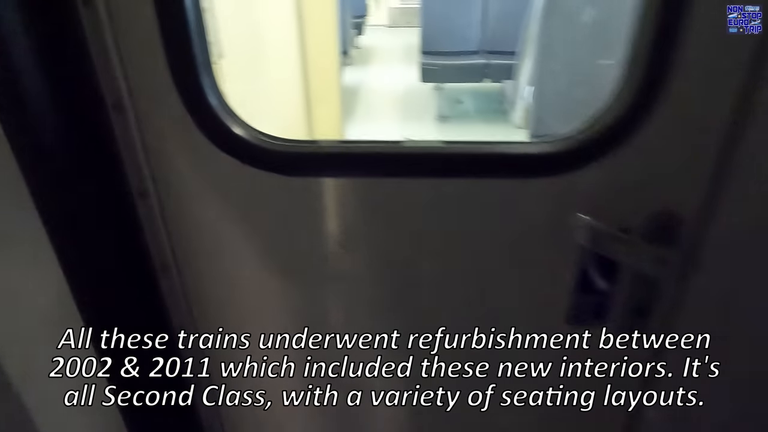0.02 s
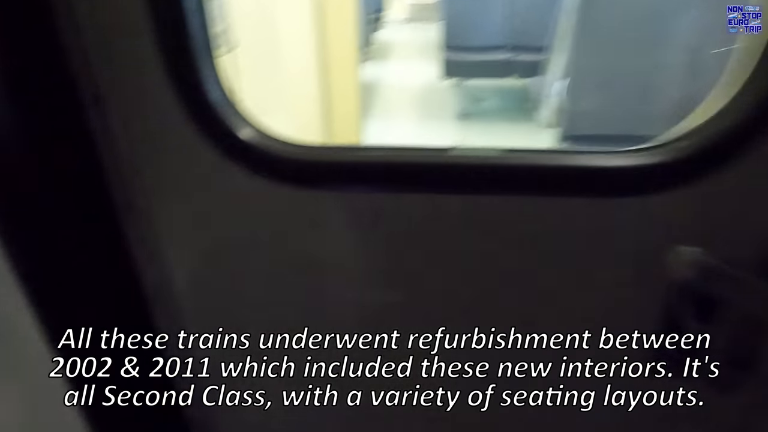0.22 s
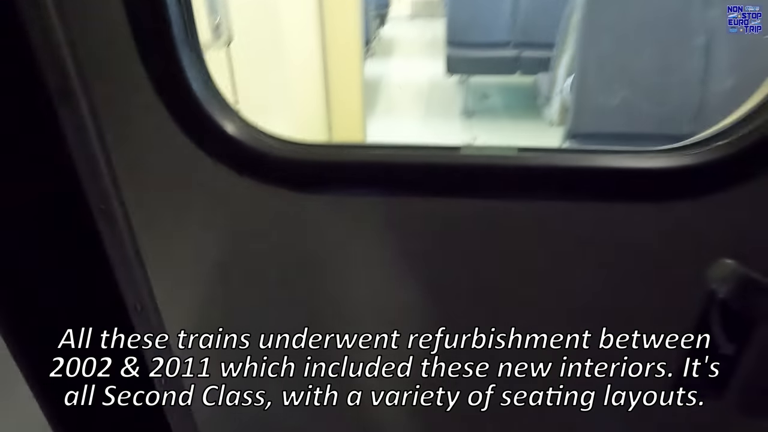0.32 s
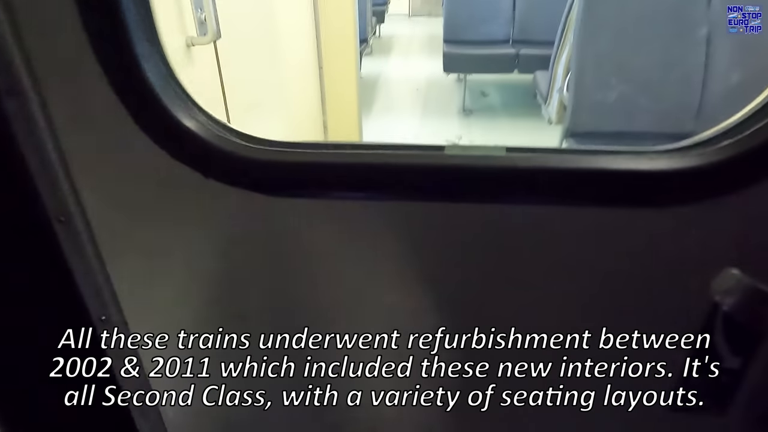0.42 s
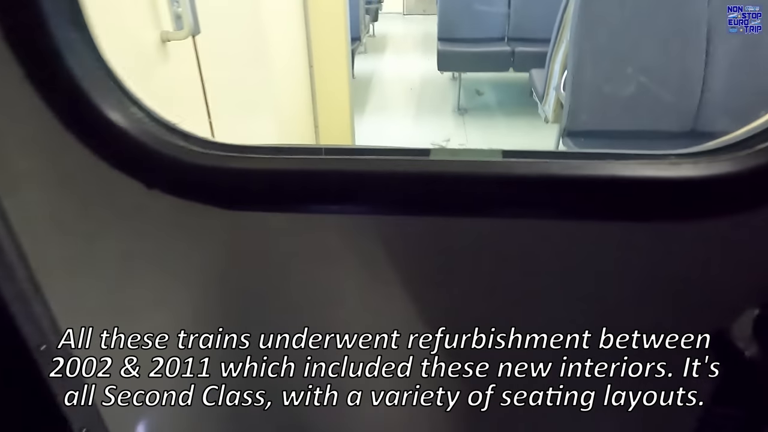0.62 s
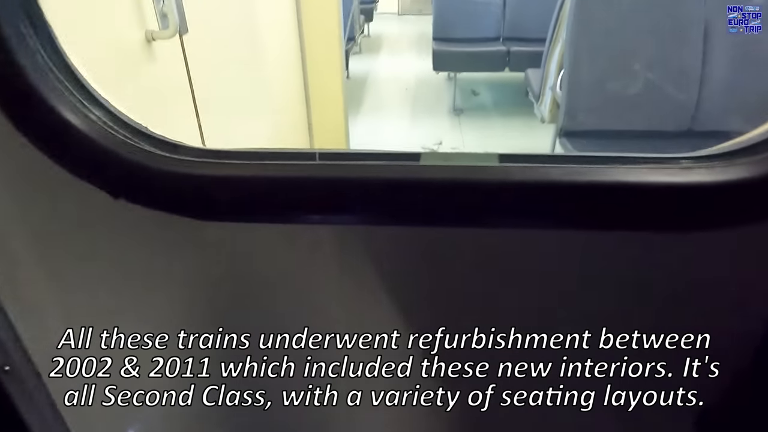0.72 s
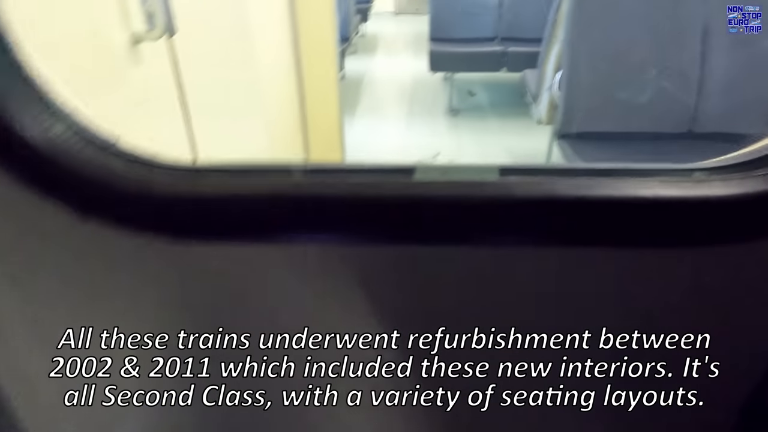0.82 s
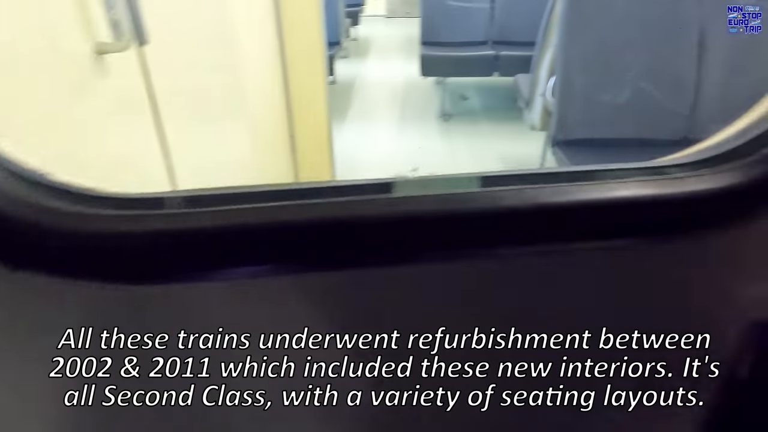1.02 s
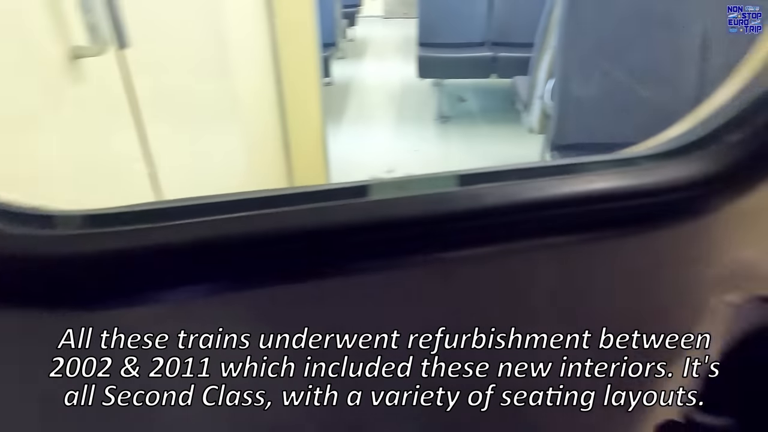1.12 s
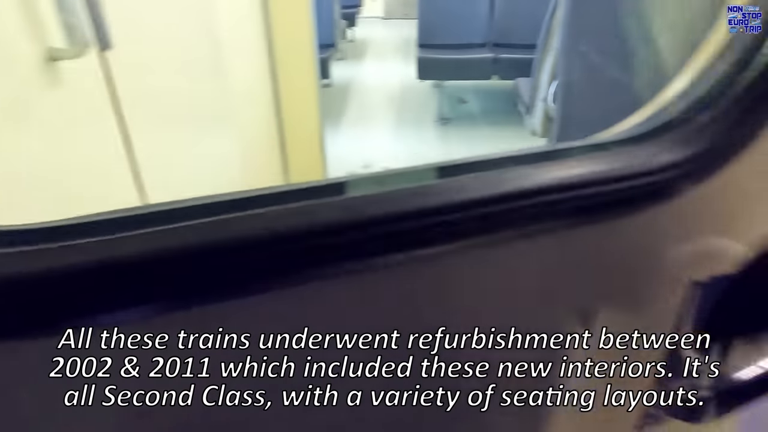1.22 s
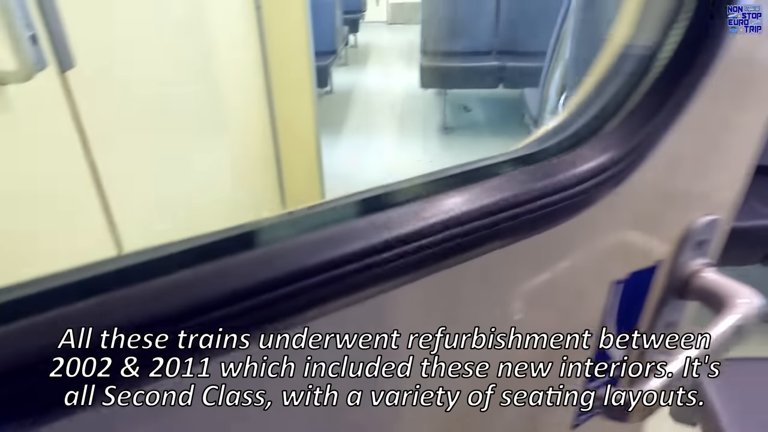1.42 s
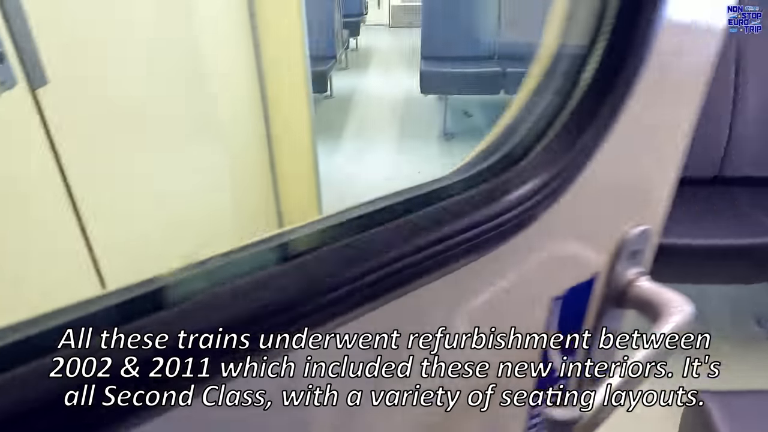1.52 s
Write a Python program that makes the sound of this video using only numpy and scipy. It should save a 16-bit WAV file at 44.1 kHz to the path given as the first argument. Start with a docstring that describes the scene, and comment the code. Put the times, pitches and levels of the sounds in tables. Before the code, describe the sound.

A hinged train carriage door opens, very close, in a small vestibule with short reflections and a faint low hum throughout. Grainy scraping and soft deep movement start it; at 0.23-0.4 s loud latch clacks and heavy booming thuds, with a thin high squeak at 0.43. A solid clunk lands at 0.58, lesser knocks at 0.78 and 0.89, a light metallic click at 1.13, then a thump and quick handle rattle around 1.36-1.45.

```python
"""A hinged door in a standing train carriage is unlatched and pushed open, close to the microphone.
A low wavering hum and soft noise run throughout; grainy scraping and deep thuds made from sines join in.
The latch clacks: noise bursts with a booming panel of fading sines; metal parts ring along as filtered noise.
The leaf jolts free with a short squeak, one unsteady high sine, and the lock clunks on as more such blows.
Near the end the loose handle rattles as quick noise bursts; noise tails give the small vestibule's answer."""
import sys
import numpy as np
from scipy import signal
from scipy.fft import rfft, irfft
from scipy.io import wavfile
from scipy.ndimage import uniform_filter1d

SR = 44100
rng = np.random.default_rng(int(sys.argv[2]) if len(sys.argv) > 2 else 0)


def put_to_file(sound):
    """Save the sound as 16-bit audio at rate SR, in the file named by the first command-line argument."""
    columns = np.atleast_2d(sound).T  # one column per channel
    safe = np.clip(columns, -1, 1)
    whole_steps = np.round(safe * 32767)
    wavfile.write(sys.argv[1], SR, whole_steps.astype(np.int16))


N = 70560  # length in samples: 1.6 s

# carriage background noise: pitch_hz, level_db (per octave)
BACKGROUND_TONE = [(12, -48.5), (28, -40), (55, -52.5), (120, -51), (300, -64.5), (700, -66), (2000, -69.5),
                   (5000, -68), (8000, -70), (12500, -77), (16000, -99)]
# low hum notes of wavering strength: pitch_hz, level_db
HUM_NOTES = [(49, -42.5), (126, -60), (320, -59)]
# loudness of the rubbing handle and leaf: time_s, level_db
SCRAPE_LEVEL = [(0, -48), (.06, -44.5), (.11, -41.5), (.17, -43.5), (.225, -52), (.3, -37.5), (.55, -59.5),
                (.95, -83), (1.09, -66.5), (1.27, -72.5), (1.38, -55), (1.6, -60)]
# colour of the rubbing: pitch_hz, level_db (per octave)
SCRAPE_COLOUR = [(100, -19), (300, -4.5), (800, -10), (1600, -3), (3400, -0.5), (7500, -2), (10500, -12.5),
                 (12500, -7), (15000, -40)]
# deep thuds of leaf and floor: start_s, level_db, pitch_hz, time_to_peak_s
DEEP_THUDS = [(.0, -35.5, 93, 0.041), (0.058, -24.5, 28.8, 0.091), (.23, -17, 77.4, 0.0092),
              (0.24, -13.5, 32.5, 0.023), (0.307, -9, 34.3, 0.022), (0.348, -3, 32.4, 0.021),
              (.49, -31.5, 43, 0.065), (0.607, -18, 38.9, 0.015), (.72, -29.5, 47.1, 0.029),
              (0.831, -21, 33, 0.028), (.985, -19.5, 27.2, 0.02), (1.085, -32.5, 40, 0.012),
              (1.365, -22.5, 69, 0.0062), (1.402, -28, 35.5, 0.013)]
# metal parts set ringing as the lock works: start_s, pitch_hz, width_hz, level_db, fade_s (to -60 dB)
METAL_RINGS = [ (0.101, 3240, 397, -36.5, 0.28), (.265, 2850, 710, -21.5, 0.14),
               (.345, 1530, 360, -20.5, 0.24), (.40, 4800, 1200, -32, 0.28), (.47, 522, 50, -34.5, 0.24),
               (.579, 970, 130, -26.5, 0.24), (.579, 2100, 276, -29.5, 0.24), (.579, 6600, 800, -30, 0.21),
               (.59, 677, 120, -21.5, 0.19), (.592, 4300, 940, -28.5, 0.23), (.891, 623, 53.7, -34, 0.23),
               (.891, 1930, 150, -38, 0.21), (1.055, 642, 50.3, -54.5, 0.33), (1.069, 7700, 1100, -57, .4),
               (1.125, 3980, 800, -42.5, 0.12), (1.127, 910, 250, -47, 0.08),
               (1.127, 7920, 905, -36.5, 0.1), (1.178, 810, 140, -49.5, .18),
               (1.412, 4520, 352, -34.5, 0.19)]
# latch and lock blows: start_s, build_up_s, crack_db (over the tail), panel_db (over the blow's colour),
# then six colour levels_db (per octave), one for each pitch in COLOUR_PITCHES
LATCH_BLOWS = [ (.231, 0.0012, -4, -0.5, -15, -37, -40.5, -54, -75, -75),
               (0.265, 0.00076, 0, -2.5, -26, -33.5, -35.5, -22.5, -28, -38),
               (.329, 0.0025, 5, 6, -35, -34, -30, -27.5, -33, -48),
               (.3425, 0.0044, -15, 5.5, -46, -26, -17, -24.5, -28, -38.5),
               (.369, 0.018, -17, 4, -21.5, -20.5, -18.5, -28, -36, -70),
               (.577, 0.0096, 12, 1.5, -33, -18.5, -24, -34, -33.5, -34),
               (.594, 0.0032, -15, 3.5, -35.5, -24, -30.5, -36.5, -32, -59),
               (0.773, 0.00066, -14, -4, -46, -46.5, -47, -51, -64, -87),
               (0.784, .002, 2, 4, -45.5, -45.5, -45.5, -46, -49.5, -70),
               (0.851, 0.024, -8, 2, -55, -44, -48, -53, -64, -103),
               (.889, 0.006, 10.5, 1.5, -32.5, -37.5, -37, -33.5, -33, -49),
               (1.1261, .001, 13, 4, -66, -44.5, -58, -55, -43, -47),
               (1.172, 0.0033, 5, 0, -56, -41.5, -61, -60, -71, -84),
               (1.207, 0.001, -2, 3, -40, -71, -75, -77, -76, -81),
               (1.232, 0.0009, -8, -7, -58, -65, -57, -87, -83, -86),
               (1.361, 0.0076, -2, -5, -25, -62, -66, -72, -68, -69)]
# pitches at which each blow's colour is given: pitch_hz
COLOUR_PITCHES = [150, 500, 1500, 3800, 7500, 12500]
# tone of door and vestibule, shared by blows and metal rings: pitch_hz, level_db
DOOR_COLOUR = [(40, -13), (95, -4.5), (150, -13), (300, -4.5), (700, -3), (1050, -3), (1850, 1),
               (2700, -3.5), (4700, 0), (7200, 1.5), (9000, -2), (10700, -5), (12300, 2.5), (15000, -28)]
# ringing notes of the door panel: pitch_hz, level_db, fade_s (to -60 dB)
PANEL_MODES = [(118.6, -2.5, 0.4), (179.7, -2, 0.32), (215.2, -15.5, 0.53), (268, -5.5, 0.38),
               (317.7, -1, 0.39), (386, -6, 0.3), (444, -11, 0.33), (521, -9.5, 0.2), (535, -17.5, 0.19),
               (628.4, -11.5, 0.35), (685, -5.5, 0.22), (743.5, -7.5, 0.27), (1325, -8.5, 0.17),
               (1836, -9, 0.18)]
# vestibule tail: pitch_hz, fade_s (to -60 dB)
ROOM_FADE = [(150, 0.47), (500, 0.27), (1400, 0.23), (3800, .25), (7500, 0.2), (12500, 0.21)]
# loudness of the squeak: time_s, level_db
SQUEAK_LEVEL = [(.412, -70), (.426, -29.5), (.447, -30.5), (.475, -34.5), (.503, -41), (.522, -57.5),
                (.56, -63), (.58, -95)]
# knocks of the loose handle: start_s, level_db, crack_db (over the tail)
HANDLE_KNOCKS = [(1.3867, -44, 10.5), (1.406, -38, 7), (1.413, -37.5, 10), (1.425, -36.5, 12.5),
                 (1.438, -43, 5), (1.451, -39, 15)]
# colour of the knocks: pitch_hz, level_db (per octave)
KNOCK_COLOUR = [(150, -13.5), (500, -18), (1000, -11), (2200, -2.5), (3700, -7.5), (4650, -7.5),
                (5400, -12), (7500, -21.5), (9500, -32), (14000, -41)]
# how alike left and right are: pitch_hz, likeness (limited to 0-1 in use)
STEREO_LIKENESS = [(60, 2.2), (250, 1.02), (600, 0.81), (2000, 0.6), (8000, 0.61), (12500, 0.3)]
# left minus right: pitch_hz, difference_db
STEREO_BALANCE = [(60, 0.89), (300, 0.92), (1000, 2), (4000, 1.9), (8000, 1.6), (12500, 7.4)]

CRACK_S, CHATTER_DB, CHATTER_S = 0.0021, 1.5, 0.0028
RIPPLE_DB, RIPPLE_HZ = 3, 25.27  # size and spacing of the random peaks and dips
PANEL_RISE_S, PANEL_BEAT, PANEL_BEAT_S = 0.0056, 0.33, 0.039
RING_RISE_S, THUD_LAG_S = 0.0016, 0.00018
SQUEAK_HZ, SQUEAK_WAVER_HZ, SQUEAK_ROUGH = 7760, 24, 0.42
CUTOFF_HZ = 15050


def amp(db):
    """Turns decibels into gain."""
    return 10 ** (np.asarray(db) / 20)


def read(points, hz):
    """Reads a table by pitch, with straight lines along a log-frequency axis."""
    f, value = np.transpose(points)
    return np.interp(np.log(hz + 1), np.log(f + 1), value)


def level(points):
    """Turns a table of times and decibels into gain over time."""
    return amp(np.interp(np.arange(N) / SR, *np.transpose(points)))


def fade(t, t60):
    """Exponential decay that drops 60 dB in t60 seconds."""
    return np.exp(-np.log(1000) * t / t60)


def add(mix, s, sound):
    """Mixes in a sound from time s, cutting it off at the end of the mix."""
    start = max(round(s * SR), 0)
    part = mix[:, start:][:, :sound.shape[-1]]
    part += sound[..., :part.shape[1]]


def waver(n, seconds):
    """Smooth random movement around zero, of unit size; longer seconds make it slower."""
    v = signal.lfilter([1], [1, -np.exp(-1 / (seconds * SR))], rng.standard_normal(n))
    v = uniform_filter1d(v, size=40)
    return (v - v.mean()) / v.std()


def noise(n, *tones):
    """Stereo noise from random phases, its level per octave the sum of the given tables."""
    hz = np.fft.rfftfreq(n, 1 / SR)
    a, b = np.exp(2j * np.pi * rng.random((2, len(hz))))
    like = np.clip(read(STEREO_LIKENESS, hz), 0, 1)
    lean = read(STEREO_BALANCE, hz) / 2
    # the shared middle makes the sides alike, the difference sets them apart
    mid = a * np.sqrt((1 + like) / 2)
    side = b * np.sqrt((1 - like) / 2)
    octave_gain = np.sqrt(SR * n / (2 * np.log(2) * (hz + 10)))
    gain = amp(sum(read(tone, hz) for tone in tones)) * octave_gain
    left, right = (mid + side) * amp(lean), (mid - side) * amp(-lean)
    return irfft(np.array([left, right]) * gain, n)


def ripple(hz):
    """The many close resonances of a metal door, as random peaks and dips."""
    grid = np.arange(2000) * RIPPLE_HZ
    return amp(RIPPLE_DB * np.interp(hz, grid, rng.standard_normal(len(grid))))


def impact(tones, rise_s, crack_db):
    """A crack with chattering contact, then dense reflections that fade at their own rate in each band."""
    t = np.arange(SR // 2) / SR
    hz = np.fft.rfftfreq(len(t), 1 / SR)
    spectrum = rfft(noise(len(t), *tones)) * ripple(hz)
    centres, t60s = np.transpose(ROOM_FADE)
    crack = amp(crack_db) * np.exp(-t / CRACK_S)
    out = 0
    # each share is 1 at its own band centre and 0 at the others, so the bands overlap smoothly
    for share, t60 in zip(np.eye(len(ROOM_FADE)), t60s):
        band = irfft(spectrum * read(np.c_[centres, share], hz), len(t))
        out = out + band * (fade(t, t60) + crack)
    shake = np.clip(waver(len(t), CHATTER_S), -2, 2) * np.exp(-t / 0.046)
    return out * amp(CHATTER_DB * shake) * np.minimum(t / rise_s, 1)


def carriage():
    """Rumble and ventilation as steady noise, under low sines whose strength wavers."""
    t = np.arange(N) / SR
    hum = 0
    for hz, db in HUM_NOTES:
        strength = amp(db) * (1 + 0.43 * waver(N, 0.08))
        hum = hum + strength * np.sin(2 * np.pi * (hz * t + rng.random()))
    return noise(N, BACKGROUND_TONE) + hum


def scrape():
    """Grainy rubbing as handle and leaf move: noise with fast random changes of loudness."""
    grain = amp(0.5 * waver(N, 0.00067))
    return noise(N, SCRAPE_COLOUR) * level(SCRAPE_LEVEL) * grain


def thuds():
    """The heavy leaf shoves the air: deep cycles swell and die, reaching the right side slightly later."""
    out = np.zeros((2, N))
    t = np.maximum(np.arange(SR // 2) / SR - np.array([[0], [THUD_LAG_S]]), 0)
    for s, db, hz, peak_s in DEEP_THUDS:
        swell = t / peak_s * np.exp(1 - t / peak_s)  # reaches 1 at peak_s
        add(out, s, amp(db) * swell * np.sin(2 * np.pi * hz * t))
    return out


def rings():
    """Bolt, catch and handle each ring in a tight cluster of modes: narrow noise that fades away."""
    out = np.zeros((2, N))
    t = np.arange(SR // 2) / SR
    f = np.fft.rfftfreq(len(t), 1 / SR)
    for s, hz, width_hz, db, t60 in METAL_RINGS:
        resonance = ripple(f) / (1 + (2 * (f - hz) / width_hz) ** 2)
        cluster = irfft(rfft(noise(len(t), DOOR_COLOUR)) * resonance, len(t))
        envelope = np.minimum(t / RING_RISE_S, 1) * fade(t, t60)
        add(out, s, amp(db) * cluster / cluster.std() * envelope)
    return out


def panel(colour):
    """The door panel rings as fading sines; each mode takes its share of the blow's colour."""
    t = np.arange(SR * 3 // 4) / SR
    out = np.zeros((2, len(t)))
    halves = np.array([[0.5], [-0.5]])  # left, right
    for hz, db, t60 in PANEL_MODES:
        # less alike sides get a wider phase gap, either side leading
        gap = np.arccos(np.clip(read(STEREO_LIKENESS, hz), 0, 1)) * rng.choice([-1, 1])
        lean = amp(halves * read(STEREO_BALANCE, hz))
        beat = 1 + PANEL_BEAT * waver(len(t), PANEL_BEAT_S)
        tone = np.sin(2 * np.pi * (hz * t + rng.random()) + halves * gap)
        out += lean * beat * amp(db + read(colour, hz)) * fade(t, t60) * tone
    return out * (1 - np.exp(-t / PANEL_RISE_S))


def latch():
    """Metal parts of latch and lock strike home and set the panel ringing."""
    out = np.zeros((2, N))
    for s, rise_s, crack_db, panel_db, *colour_db in LATCH_BLOWS:
        colour = list(zip(COLOUR_PITCHES, colour_db))
        add(out, s, impact([DOOR_COLOUR, colour], rise_s, crack_db))
        add(out, s, amp(panel_db) * panel(colour))
    return out


def squeak():
    """Dry metal sings on one high note, unsteady in pitch and roughened in loudness."""
    turns = np.cumsum(SQUEAK_HZ + SQUEAK_WAVER_HZ * waver(N, 0.003)) / SR
    sides = []
    for db, lag in ((1.3, 0), (-0.95, 0.71)):  # left, right: gain in dB, phase shift in radians
        rough = 1 + SQUEAK_ROUGH * waver(N, 0.0047)
        sides.append(amp(db) * rough * np.sin(2 * np.pi * turns + lag))
    return np.sqrt(2) * level(SQUEAK_LEVEL) * np.array(sides)


def rattle():
    """The loose handle knocks several times as the door swings: small, quick impacts."""
    out = np.zeros((2, N))
    for s, db, crack_db in HANDLE_KNOCKS:
        add(out, s, amp(db) * impact([KNOCK_COLOUR], 0.0019, crack_db))
    return out


def scene():
    """The door over the carriage background."""
    return carriage() + scrape() + thuds() + rings() + latch() + squeak() + rattle()


def record(dry):
    """The recorder's band limit: a steep filter removes the treble above the cutoff."""
    lowpass = signal.firwin(511, CUTOFF_HZ, window=("kaiser", 9), fs=SR)
    return signal.oaconvolve(dry, lowpass[None], "same")


dry = scene()
out = record(dry)
put_to_file(out)
```